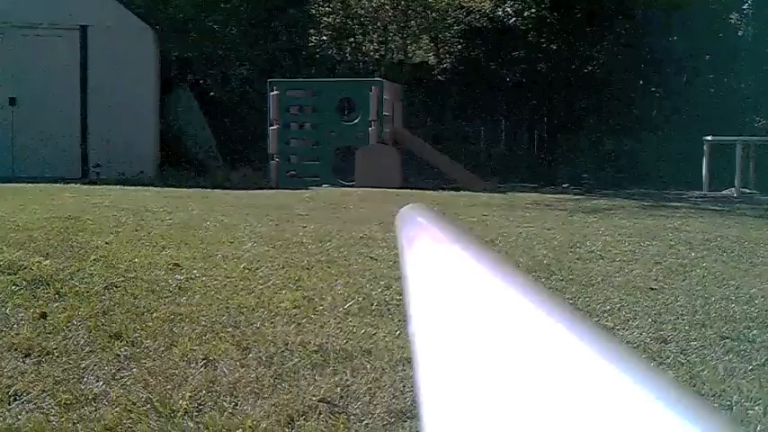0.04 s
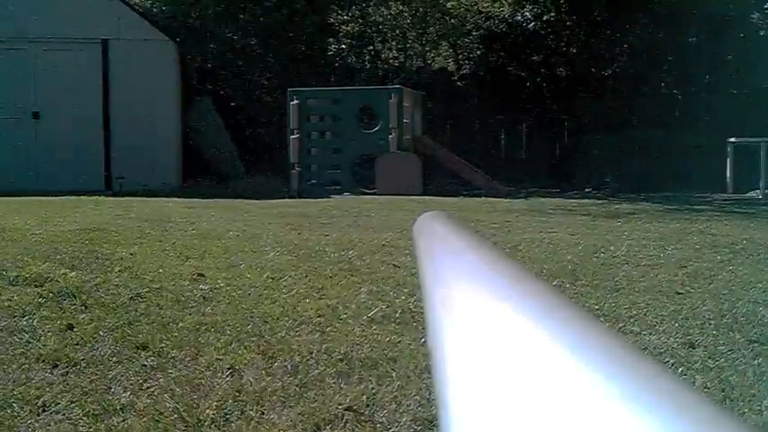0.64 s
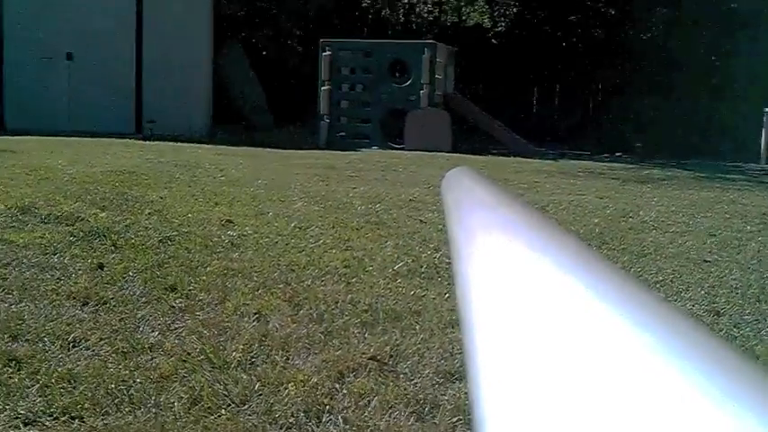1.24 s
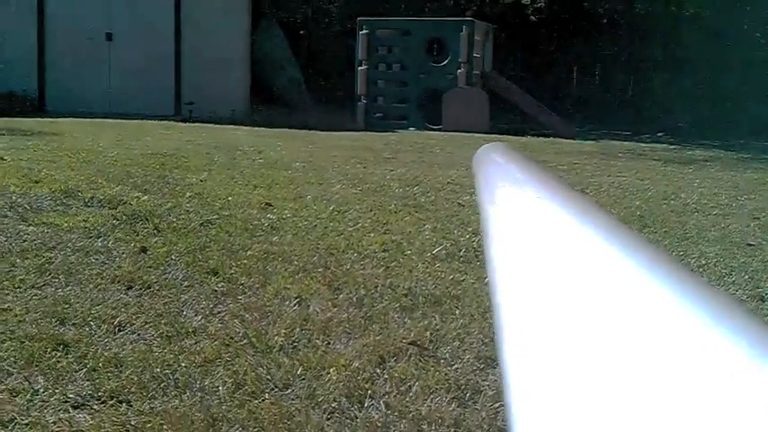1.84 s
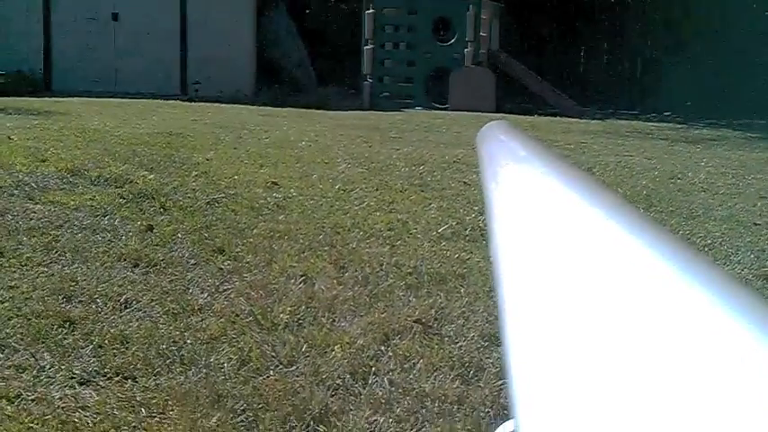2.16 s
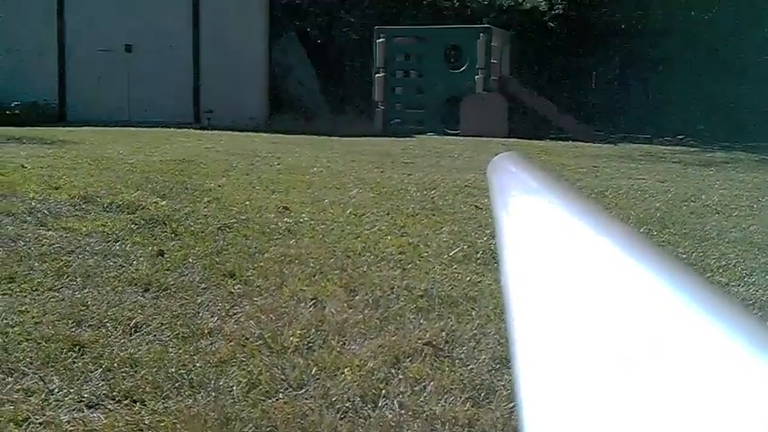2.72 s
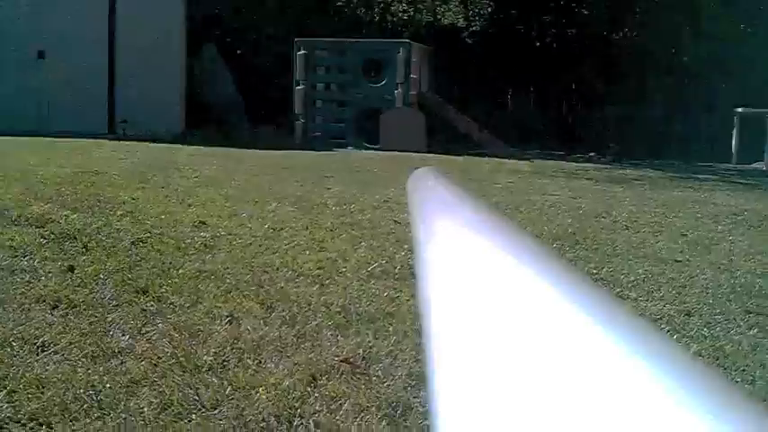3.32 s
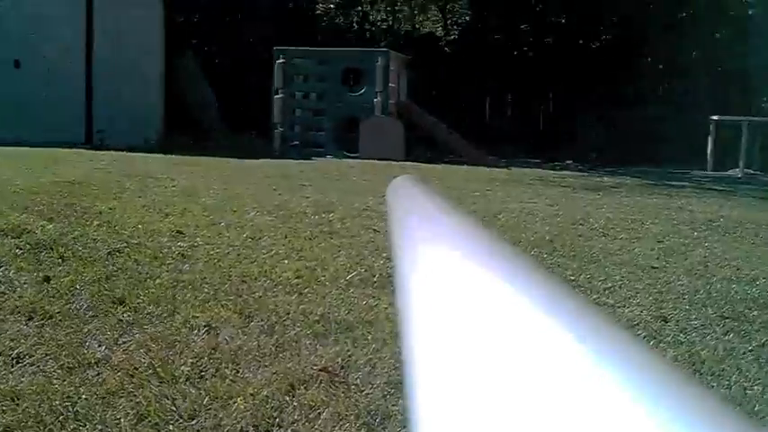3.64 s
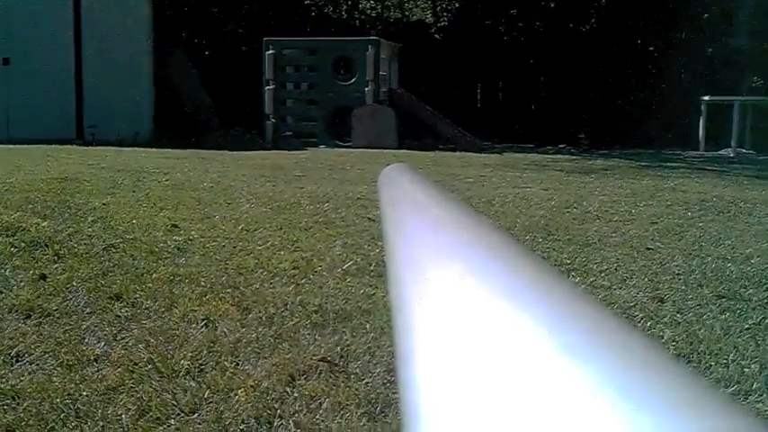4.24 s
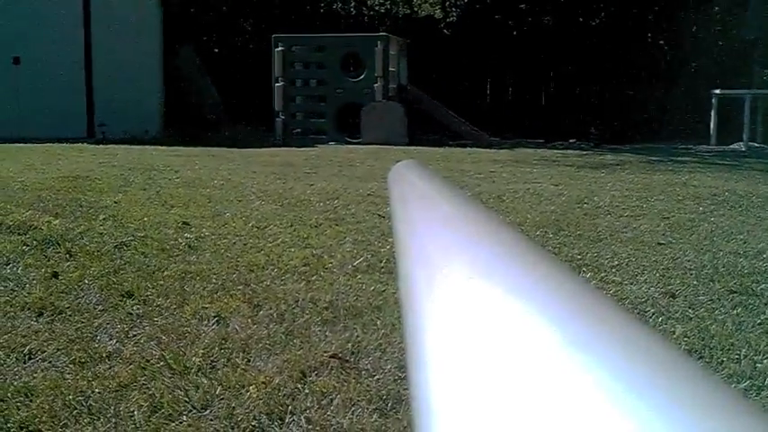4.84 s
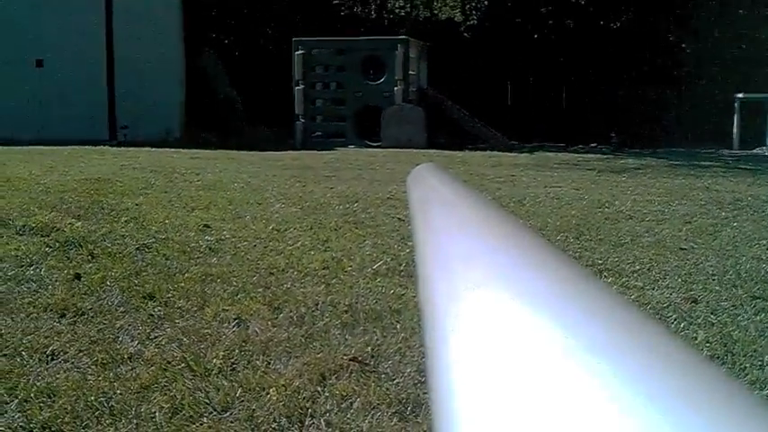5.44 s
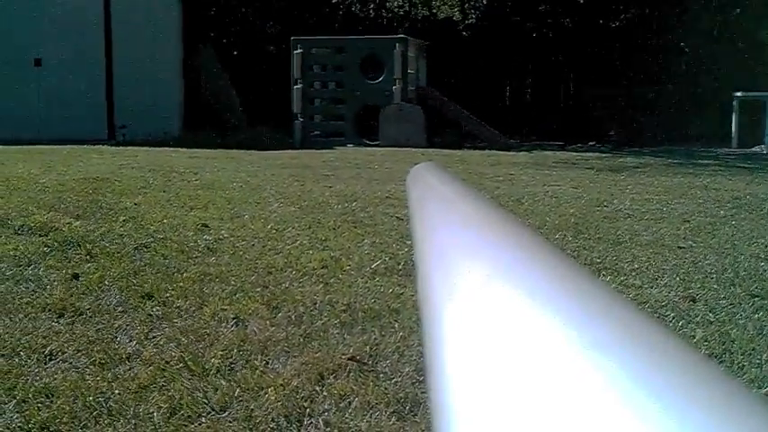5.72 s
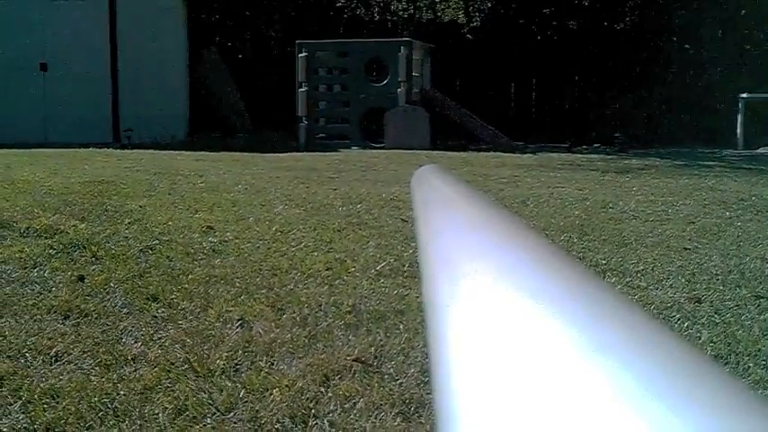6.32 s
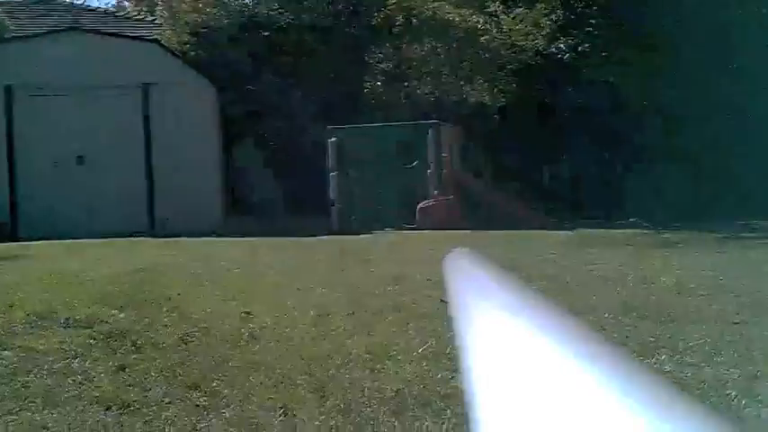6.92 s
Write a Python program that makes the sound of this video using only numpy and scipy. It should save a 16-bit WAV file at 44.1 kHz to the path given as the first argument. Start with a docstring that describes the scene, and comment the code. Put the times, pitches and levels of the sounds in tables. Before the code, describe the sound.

A distant bird chirps again and again, each call a hoarse rasp and a short whistle, over a low, soft traffic hum outdoors. Close by come a few light plastic ticks and a sharper snap from handling an air cannon. Then the cannon suddenly fires right beside the microphone: rapid valve clacks, hissing gushes of air and a hollow, overloaded boom.

```python
"""A quiet backyard, with a hand-held air cannon close to a small camera microphone. Traffic hums far off.
In the trees a bird repeats a raspy call that breaks into a thin whistle; close by, the plastic gun
ticks in the hand. Then the valve clacks open, air rushes out of the muzzle, and the air column in the
long barrel booms hard enough to overload the microphone."""
import sys
import numpy as np
from scipy import signal
from scipy.fft import rfft, irfft, next_fast_len
from scipy.io import wavfile
from scipy.ndimage import uniform_filter1d

SR = 44100
rng = np.random.default_rng(int(sys.argv[2]) if len(sys.argv) > 2 else 0)


def materialize(psi):
    """Save the field psi as 16-bit PCM at rate SR to the path in sys.argv[1].

    A 1-D psi becomes a single channel; in a 2-D psi each row is a channel.
    """
    bounded = np.clip(np.atleast_2d(psi).T, -1, 1)
    quanta = np.round(bounded * 32767).astype(np.int16)
    wavfile.write(sys.argv[1], SR, quanta)


N = 307377
T = np.arange(N) / SR


def undb(db):
    """Decibels to gain."""
    return 10 ** (np.asarray(db) / 20)


def unit(x):
    """Scale to rms 1."""
    return x / np.sqrt(np.mean(x ** 2))


def add(out, start, x):
    """Mix x into out from start, in seconds."""
    i = int(np.clip(start * SR, 0, N - 1))
    out[i:i + len(x)] += x[:N - i]


def fade(t, t60):
    """Exponential decay by 60 dB in t60 seconds."""
    return np.exp(-np.log(1000) * t / t60)


def envelope(age, attack, hold, t60):
    """Rise from age 0, then die away from age hold; all in seconds."""
    return np.clip(age / attack, 0, 1) * fade(np.maximum(age - hold, 0), t60)


def noise(spectrum):
    """Noise of rms 1 coloured by (frequency [Hz], level [dB]) points."""
    hz, db = np.transpose(spectrum)
    size = next_fast_len(N)
    bins_hz = np.maximum(np.fft.rfftfreq(size, 1 / SR), 1)
    colour = undb(np.interp(np.log(bins_hz), np.log(hz), db))
    return unit(irfft(rfft(rng.standard_normal(size)) * colour, size)[:N])


def resonate(x, hz, q):
    """One resonance, gain 1 at its centre."""
    return signal.lfilter(*signal.iirpeak(min(hz, SR / 3), max(q, .5), fs=SR), x)


def ring(modes):
    """Decaying modes after one blow."""
    t = T[:SR // 2]
    return sum(undb(db) * np.sin(2 * np.pi * hz * t) * fade(t, t60) for hz, db, t60 in modes)


def walk(rate):
    """Random drift of rms 1, sliding to a new value rate times a second."""
    step = max(int(SR / rate), 1)
    held = np.repeat(rng.standard_normal(N)[:N // step + 1], step)
    return unit(uniform_filter1d(held, step)[:N])


def scatter(x, t60, wet_db, build_s):
    """The direct sound plus its diffuse return from trees, fence and shed."""
    t = T[:SR]
    tail = rng.standard_normal(SR) * fade(t, t60) * np.minimum(t / build_s, 1)
    return x + undb(wet_db) * signal.fftconvolve(x, tail / np.linalg.norm(tail))[:N]


# Distant traffic and air, as they reach the yard: (frequency [Hz], relative level [dB])
TRAFFIC_SPECTRUM = [(15, -46), (25, -9.5), (52, -4.5), (81, -3), (110, -6.5), (169, -5), (231, -7),
                    (301, -11.5), (534, -12.5), (695, -12.5), (747, -10), (1290, -15), (3530, -28),
                    (6580, -31), (7600, -36.5), (9880, -72), (16700, -120)]
# A far engine fading and coming back: (time [s], relative level [dB])
ENGINE_LEVELS = [(0, -50.5), (2.2, -53.5), (3.3, -60), (4.2, -58), (6.3, -48)]


def distant_traffic(traffic_db=-49.14, engine_hz=112):
    """Far beyond the yard: steady traffic with a slow swell, and the drone of one engine."""
    traffic = noise(TRAFFIC_SPECTRUM) * undb(traffic_db + 0.5 * walk(1.63))
    drone = unit(resonate(resonate(rng.standard_normal(N), engine_hz, q=3.9), engine_hz, q=3.9))
    drone_db = np.interp(T, *np.transpose(ENGINE_LEVELS)) - 6
    return traffic + drone * undb(drone_db)


# Calls from the trees, levels relative:
# (rasp start [s], whistle start [s], pitch [Hz], rasp level [dB], whistle level [dB])
BIRD_CALLS = [(.05, 0.165, 1464, -57, -54.5), (.74, .91, 1428, -55.5, -55),
              (1.45, 1.632, 1418, -54.5, -57.5), (2.16, 2.341, 1430, -57, -57.5),
              (2.81, 3.058, 1426, -58.5, -59), (3.9, 4.069, 1402, -57.5, -55.5),
              (4.55, 4.744, 1392, -56.5, -55.5), (5.31, 5.504, 1410, -58.5, -60),
              (6.44, 6.647, 1420, -57, -55)]
# Partials of the whistle: (multiple of the pitch, relative level [dB])
WHISTLE_PARTIALS = [(2, -10.5), (3, 0), (4, -9.5), (5, -14.5)]
# The hoarse start of a call: (frequency [Hz], relative level [dB])
RASP_SPECTRUM = [(2000, -32), (2900, -3), (3500, -3), (4000, 0.5), (4600, -4), (5400, -6.5), (6500, -2),
                 (7800, -12)]


def bird(rasp_tone_db=-18, sag_db_per_s=23.5, shake_db=2.5, scoop=.11, glide_s=0.0481):
    """Off in the trees: each call starts as a rasp, then clears into a whistle that slides up to pitch."""
    out = np.zeros(N)
    hold, t60 = 0.098, 0.2  # of the whistle [s]
    hoarse = noise(RASP_SPECTRUM) * undb(1.5 * walk(70))
    wobble = 1 + .013 * walk(330) + .007 * walk(45)
    shake = undb(shake_db * walk(120) - 3.5)
    for start, clear, hz, rasp_db, whistle_db in BIRD_CALLS:
        span = slice(int(start * SR), int((clear + hold + t60) * SR))
        rasp_age, whistle_age = T[span] - start, T[span] - clear
        rasp = envelope(rasp_age, attack=0.023, hold=clear - start, t60=.35)
        rasp *= undb(rasp_db - sag_db_per_s * rasp_age)
        # the whistle swells in just before the rasp ends
        whistle = undb(whistle_db) * envelope(whistle_age + 0.038, attack=0.048, hold=hold, t60=t60)
        flatness = scoop / (1 + np.exp(2 * (whistle_age + 0.00792) / glide_s))
        pitch = hz * (1 - flatness) * wobble[span]
        phase = 2 * np.pi * np.cumsum(pitch) / SR
        tone = unit(sum(undb(db) * np.sin(k * phase) for k, db in WHISTLE_PARTIALS)) * shake[span]
        out[span] += rasp * hoarse[span] + (whistle + undb(rasp_tone_db) * rasp) * tone
    return undb(0.5) * scatter(out, t60=0.87, wet_db=-4.0, build_s=0.013)


def faint_ticks(count=7, from_s=2.5, to_s=6.5, db=-50, hz=4800, spread_db=2, spread_octaves=.4):
    """Random small slips as the grip shifts, as rows like those of PLASTIC_TICKS."""
    return [(from_s + (to_s - from_s) * when,
             db + spread_db * (2 * size - 1),
             hz * 2 ** (spread_octaves * (2 * colour - 1)))
            for when, size, colour in rng.random((count, 3))]


# Plastic ticking in the hand: (time [s], relative peak level [dB], centre frequency [Hz])
PLASTIC_TICKS = [(0.5982, -42.5, 5100), (1.037, -35, 5200), (2.7572, -44, 5340), (2.8545, -41, 3430),
                 (2.8833, -42, 4100), (4.251, -39, 6860), (4.2724, -42, 5820), (4.332, -37.5, 6760),
                 (4.487, -35.5, 6560), (4.5267, -35.5, 3920), (4.5762, -17, 5150), (4.6915, -36, 6210),
                 (5.1395, -34.5, 6600)]
# Dull knocks on the grip: (time [s], level [dB])
GRIP_KNOCKS = [(1.037, -33), (4.527, -23)]


def handling(tick_gain_db=2, chatter_db=-14, tick_q=1.24, knock_hz=620):
    """Close to the microphone: plastic slips with a snap and a short chatter; twice the grip knocks."""
    out, t = np.zeros(N), T[:SR // 20]
    for start, db, hz in PLASTIC_TICKS + faint_ticks():
        slip = undb(chatter_db) * rng.standard_normal(len(t)) * fade(t, t60=0.016) / 2
        slip[0] += 1  # the snap
        tick = resonate(resonate(slip, hz, tick_q), hz, tick_q)
        add(out, start, undb(db + tick_gain_db) * tick / np.abs(tick).max())
    knock = np.cos(2 * np.pi * knock_hz * t) * fade(t, t60=0.0043)
    dull_knock = uniform_filter1d(knock, size=5, mode="constant")
    for start, db in GRIP_KNOCKS:
        add(out, start, undb(db) * dull_knock)
    return scatter(out, t60=.2, wet_db=-22, build_s=0.0079)


# Clacks of the valve: (time [s], ring level [dB], crack level [dB], thud level [dB])
VALVE_CLACKS = [(6.6723, -14, -4, -33), (6.778, -17, -5, -25), (6.8824, -9, -1, -29),
                (6.8993, -9.5, 1.5, -30), (6.9385, -34, -14, -10)]
# Modes of the valve and its housing: (frequency [Hz], relative level [dB], t60 [s])
VALVE_MODES = [(310.4, -17, 0.17), (858, -12, .04), (1034, -9, 0.062), (1192, 2.5, 0.024),
               (1404, -9, 0.052), (1755, -2, 0.015), (2380, -32, .05), (3450, -16, 0.046),
               (4020, -17, 0.039), (5600, -25, .08), (6650, -15, 0.058)]
# Bright hiss of the air jet, also the colour of the cracks: (frequency [Hz], relative level [dB])
JET_SPECTRUM = [(500, -17), (1500, -20), (2200, -5.5), (2900, -1.5), (4000, -5.5), (5100, -4), (6400, 1.5),
                (7200, -3.5), (8500, -2)]


def valve(thud_hz=190, overtone_hz=540, thud_t60=0.032):
    """At close range the valve slams open and rattles: a crack, a ringing housing, a thud in the pipe."""
    out, housing, grit = np.zeros(N), ring(VALVE_MODES), noise(JET_SPECTRUM)
    thud = ring([(thud_hz, 0, thud_t60), (overtone_hz, -4, thud_t60 / 2)])
    for start, ring_db, crack_db, thud_db in VALVE_CLACKS:
        add(out, start, undb(ring_db) * housing + undb(thud_db) * thud)
        out += undb(crack_db) * grit * (T >= start) * fade(np.abs(T - start), t60=0.0098)
    return out


# Gushes of air from the muzzle: (time [s], hold [s], jet level [dB])
MUZZLE_GUSHES = [(6.708, 0.042, -20), (6.797, 0.055, -19.5), (6.954, .006, -22.5)]
# Roar of the full flow: (frequency [Hz], relative level [dB])
ROAR_SPECTRUM = [(150, -22), (310, -10), (430, -9), (750, -4.5), (1000, 7), (1300, -3.5), (1550, 1),
                 (2100, -8), (4000, -8), (8000, -30)]
# Air buffeting the microphone: (frequency [Hz], relative level [dB])
BUFFET_SPECTRUM = [(30, -22), (90, -4.5), (175, 0.5), (310, 2.5), (420, -11.5), (650, -9), (1200, -36),
                   (4000, -57)]
# Pressure surges, which also set the barrel booming: (time [s], boom level [dB], buffeting level [dB])
PRESSURE_SURGES = [(6.752, -15, -18.5), (6.8552, -27, -25.5), (6.907, -22.5, -37), (6.9415, -21.5, -24.5),
                   (6.9586, -25.5, -9)]


def rushing_air(leak_db=-31.5, attack_s=0.0019, spit_db=5.5, spit_s=0.0091, growth_s=0.043, sputter_db=2):
    """The open valve leaks; each gush grows from a thin hiss to a roar; surges buffet the microphone."""
    opens = VALVE_CLACKS[0][0]
    jet = undb(leak_db) * envelope(T - opens, attack_s, hold=0, t60=3.7)
    roar = undb(-4.5) * jet
    for start, hold, db in MUZZLE_GUSHES:
        age = T - start
        boost_db = spit_db * np.exp(-np.abs(age) / spit_s)  # the first air out is the strongest
        gush = undb(db + boost_db) * envelope(age, attack_s, hold, t60=0.2)
        roar_vs_jet_db = np.interp(age, [0, growth_s], [-23, -2])
        jet = np.hypot(jet, gush)  # noise levels add in power
        roar = np.hypot(roar, gush * undb(roar_vs_jet_db))
    buffet = undb(-19.5) * jet  # the jet itself carries some buffeting
    for start, _, db in PRESSURE_SURGES:
        surge = undb(db) * envelope(T - start, attack=0.0027, hold=0.02, t60=0.23)
        buffet = np.hypot(buffet, surge)
    sputter = undb(sputter_db * walk(600))
    flow = jet * noise(JET_SPECTRUM) + roar * noise(ROAR_SPECTRUM)
    return sputter * flow + buffet * noise(BUFFET_SPECTRUM)


# Resonances of the air column in the barrel: (frequency [Hz], relative level [dB], t60 [s])
BARREL_MODES = [(57.65, -2, 1), (115.4, -10, 0.44), (175.4, 5, 0.22), (324, -4, .18), (487, -10, 0.097)]


def barrel():
    """Right by the microphone: surges set the air column booming, first and third harmonics strongest."""
    out, column = np.zeros(N), ring(BARREL_MODES)
    for start, db, _ in PRESSURE_SURGES:
        add(out, start, undb(db) * column)
    return out


def scene():
    """From the microphone's place in the yard: cannon close by, bird in the trees, traffic far off."""
    cannon = scatter(valve() + rushing_air(), t60=0.54, wet_db=-18.5, build_s=0.02) + barrel()
    return (cannon + handling() + bird() + distant_traffic())[None]


def record(dry, ceiling_db=-15.5, presence_hz=6600, presence_db=-4, low_cut_hz=12, top_hz=7350):
    """The small microphone overloads into flat tops; the camera lifts the treble and cuts the top."""
    drive = dry / undb(ceiling_db)
    clipped = undb(ceiling_db) * drive / (1 + drive ** 4) ** (1 / 4)
    bright = clipped + undb(presence_db) * resonate(clipped, presence_hz, q=1.0)
    low_cut = signal.butter(1, low_cut_hz, "high", fs=SR, output="sos")
    top_cut = signal.cheby1(11, .2, top_hz, fs=SR, output="sos")
    return signal.sosfilt(top_cut, signal.sosfilt(low_cut, bright))


dry = scene()
out = record(dry)
materialize(out)
```